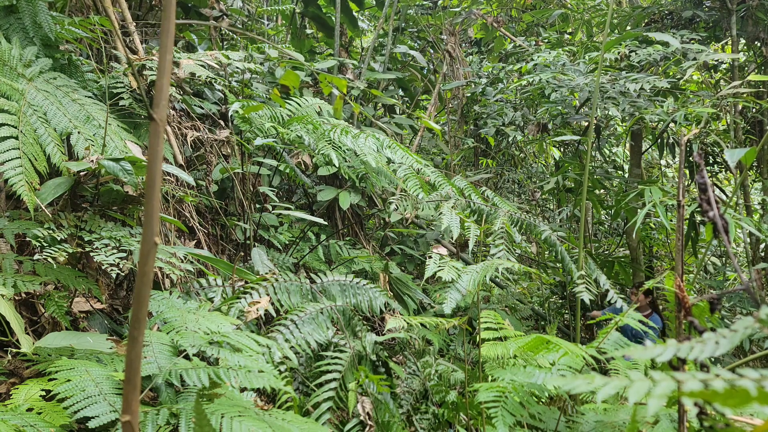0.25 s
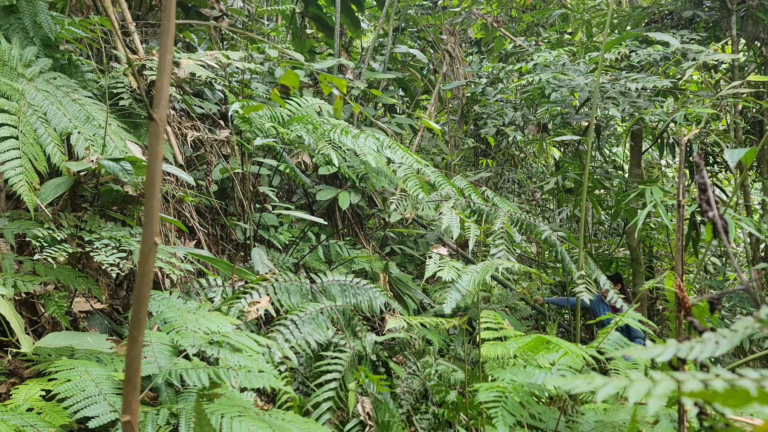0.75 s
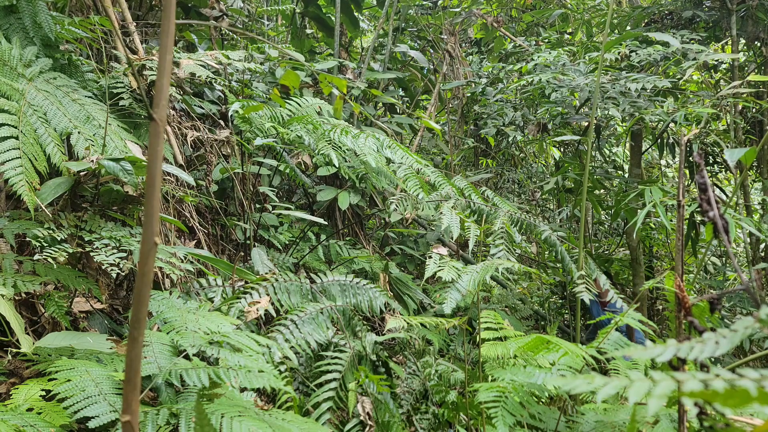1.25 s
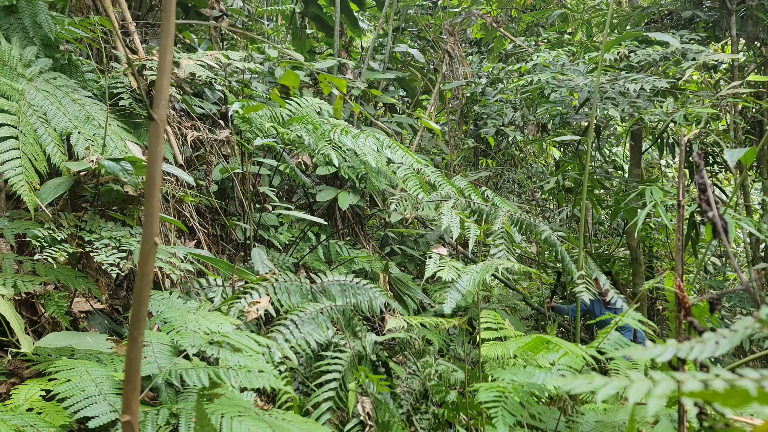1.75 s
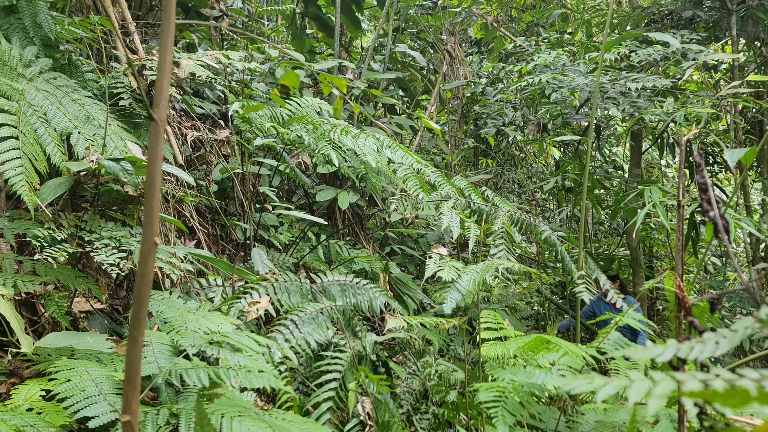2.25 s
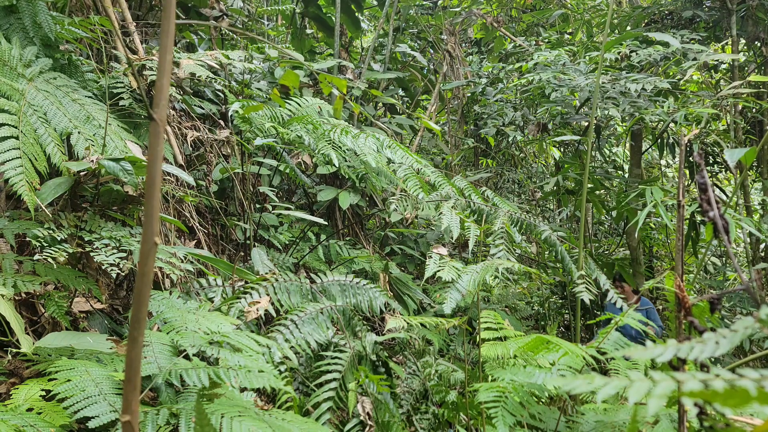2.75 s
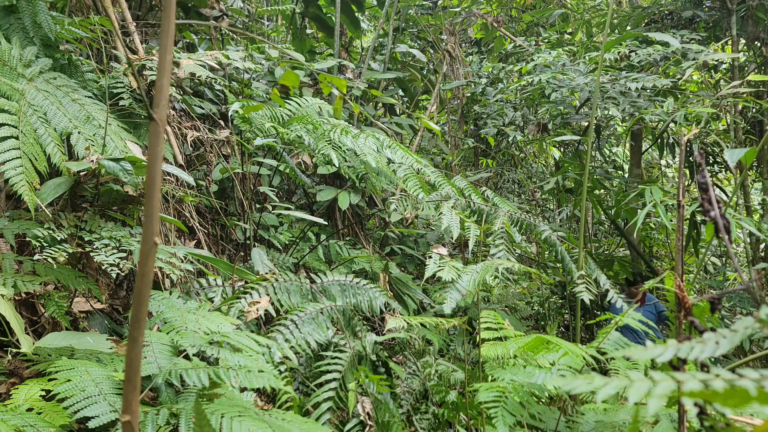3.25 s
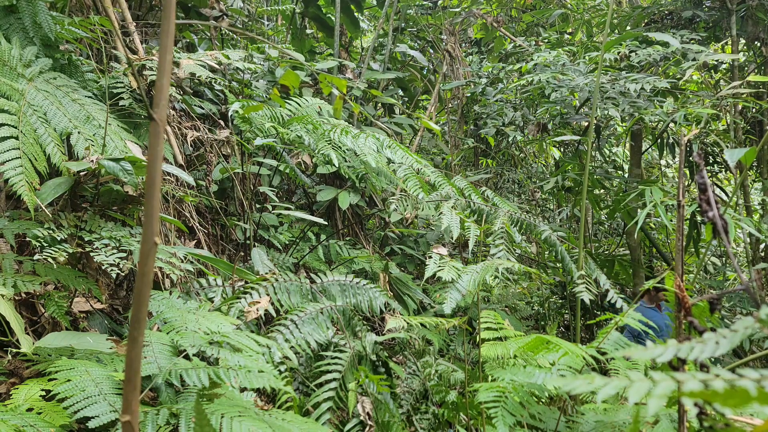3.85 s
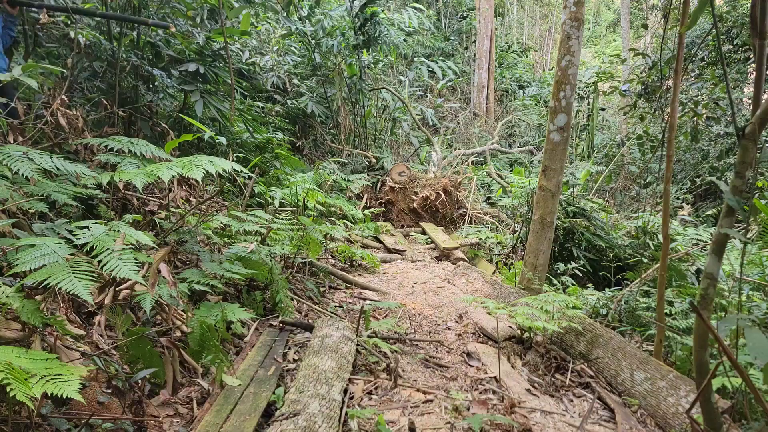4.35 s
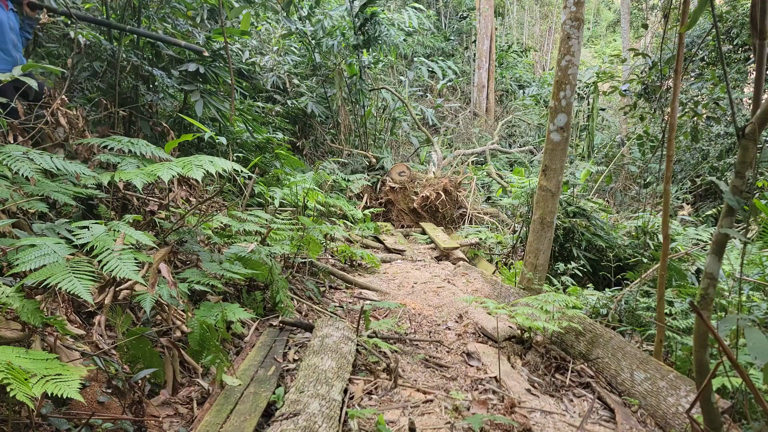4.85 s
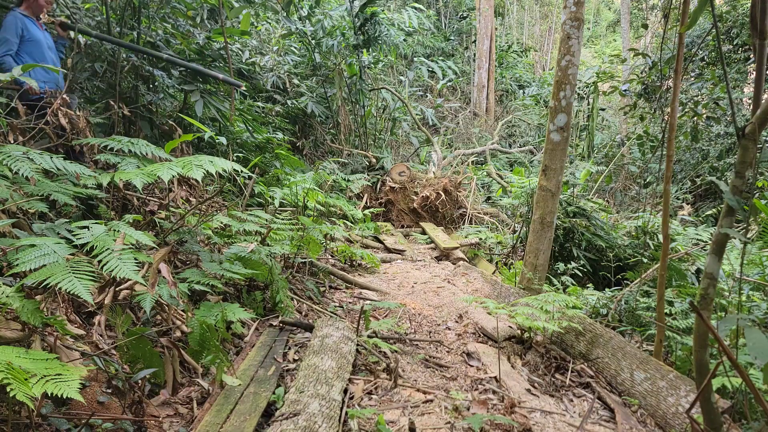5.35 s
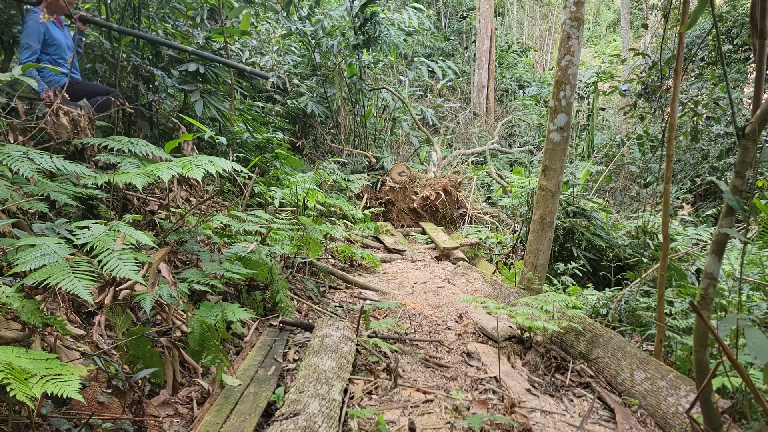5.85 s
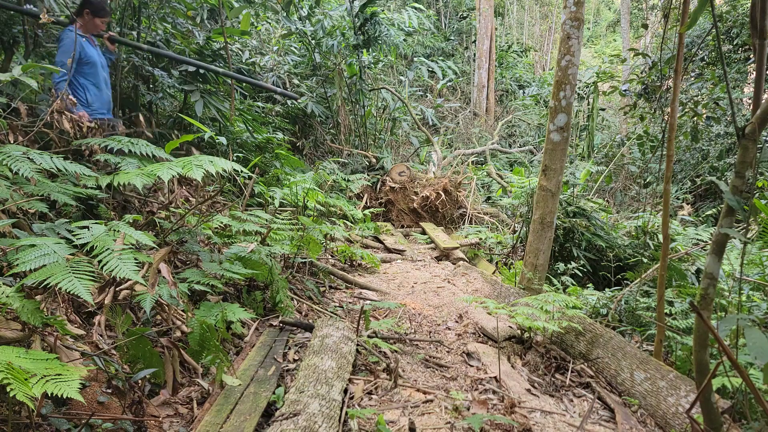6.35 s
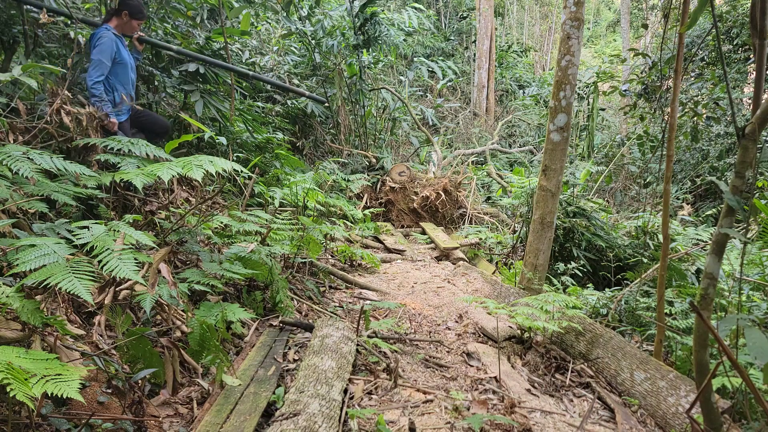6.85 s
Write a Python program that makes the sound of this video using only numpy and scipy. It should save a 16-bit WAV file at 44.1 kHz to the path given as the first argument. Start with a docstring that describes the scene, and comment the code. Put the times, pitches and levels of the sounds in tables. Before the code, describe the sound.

A bamboo pole is chopped twice at a distance, the wood tearing and the tube ringing hollow through the forest. Around the blows come light leaf rustles, woody clacks, small snaps and low thuds over a faint hush. The sound cuts out briefly past the middle, then returns nearer the microphone as a person pushes through ferns, with louder, crisper rustling, breaking twigs and a few soft steps.

```python
"""Splitting bamboo in a forest

Two hard chops split a bamboo pole some way from the microphone: the wood cracks, the air in the tube
rings hollow and the trunks echo. Leaves drag, stems knock, twigs snap and dull thuds carry from the
slope. After a moment of silence someone wades through ferns and dry litter, nearer and to the left."""
import sys
import numpy as np
from scipy import signal
from scipy.fft import rfft, irfft, next_fast_len
from scipy.io import wavfile
from scipy.ndimage import uniform_filter1d

SR = 44100
rng = np.random.default_rng(int(sys.argv[2]) if len(sys.argv) > 2 else 0)


def unload_audio(sound):
    """Save the sound as a 16-bit wav file, at the path given as the first command line argument."""
    columns = np.transpose(np.atleast_2d(sound))
    # keep every value between -1 and 1, then stretch to whole-number steps
    steps = np.round(np.clip(columns, -1, 1) * 32767)
    wavfile.write(sys.argv[1], SR, steps.astype(np.int16))


N = 313110

# the fade to silence between the far place and the near one: (time [s], fader position [0-1])
FADER = [(4.335, 1), (4.38, 0), (4.449, 0), (4.485, 1)]
NEAR_FROM_S = FADER[1][0]
FAR_LAG, NEAR_LAG = 6, -10  # samples by which the left channel is late
FAR_PAN_DB, NEAR_PAN_DB = -2.5, -1  # left minus right


def amp(db):
    """Decibels to gain."""
    return 10 ** (np.asarray(db) / 20)


def unit(x):
    """Scales to rms 1."""
    return x / np.sqrt(np.mean(x ** 2) + 1e-20)


def read(points, hz):
    """Reads a spectrum on a log-frequency axis."""
    f, value = np.transpose(points)
    return np.interp(np.log(hz + 1), np.log(f), value)


def add(mix, s, sound):
    """Mixes a stereo sound in at time s."""
    part = mix[:, round(s * SR):][:, :sound.shape[1]]
    part += sound[:, :part.shape[1]]


def freqs(x):
    """Frequency of each bin of x."""
    return np.fft.rfftfreq(x.shape[-1], 1 / SR)


def colour(x, db):
    """Filters by a gain in dB per bin."""
    return irfft(rfft(x) * amp(db), x.shape[-1])


def pan(db):
    """Gains of left and right."""
    return amp([[db / 2], [-db / 2]])


def place(s):
    """Lag and channel gains of where the person is at time s."""
    return (FAR_LAG, pan(FAR_PAN_DB)) if s < NEAR_FROM_S else (NEAR_LAG, pan(NEAR_PAN_DB))


def stereo_pair(three, lag):
    """One common signal, late on the left by lag samples, plus a scattered one for each channel."""
    # likeness of the microphone's two sides: (frequency [Hz], shared power [0-1])
    likeness = [(100, 0.83), (400, 0.84), (900, 0.6), (2000, 0.41), (5000, 0.14), (15000, 0.21)]
    common = np.clip(read(likeness, freqs(three)), 0, 1)
    direct = np.array([np.roll(three[0], lag), three[0]])
    return irfft(rfft(direct) * np.sqrt(common) + rfft(three[1:]) * np.sqrt(1 - common), three.shape[-1])


def noise(points, lag, size=SR, tilt_db=0, grain_db=0, grain_hz=100):
    """Stereo noise of a given spectrum, tilted per octave, with the random resonances of wood grain."""
    x = stereo_pair(rng.standard_normal((3, size)), lag)
    hz, knots = freqs(x), np.arange(0, SR / 2, grain_hz)
    resonances = grain_db * np.interp(hz, knots, rng.standard_normal(len(knots))) if grain_db else 0
    return unit(colour(x, read(points, hz) + tilt_db * np.log2(hz + 1) + resonances))


def forest_air(level_db=-64):
    """The faint hush of still forest all around the microphone."""
    # still air: (frequency [Hz], level [dB])
    hush = [(25, 17), (45, 0.5), (90, -7.5), (260, -12.5), (470, -2.5), (680, -9), (1250, -5), (1950, -12),
            (3600, -6), (6500, -9.5), (8700, -8), (11000, -15), (15500, -14)]
    return amp(level_db) * noise(hush, 0, size=N)


def stirring(start, swell, hold, t, settle_db_per_s=101, linger_db=-7, linger_db_per_s=46.5):
    """Gain of one push: fronds are pressed, slide and settle; the last leaves and the echo linger."""
    pressed = np.clip((t - start) / swell, 0, 1) ** 0.88
    since = np.maximum(t - start - swell - hold, 0)
    return pressed * np.maximum(amp(-settle_db_per_s * since), amp(linger_db - linger_db_per_s * since))


def push_levels(far):
    """Times, and levels in dB of swish, crisp edge and litter, summed over the far or near pushes."""
    # pushes through the foliage: (start [s], swell [s], hold [s], swish [dB],
    # crisp edge over swish [dB], litter over swish [dB])
    pushes = [(0, 0.0033, 0.029, -64, -1.5, -14), (0.25, 0.045, 0.19, -66.5, -4, -2),
              (0.565, 0.027, 0.018, -66.5, 0, -17), (0.683, 0.23, 0.097, -59, -2.5, 0.5),
              (0.862, 0.082, .01, -48, -8, -5.5), (1.13, 0.06, 0.053, -62, -12, -9),
              (2.006, 0.048, 0.049, -50.5, -4, -2.5), (2.12, 0.018, 0.07, -53, 0, -8.5),
              (2.265, 0.46, .08, -53.5, -3.5, -8), (2.758, 0.094, .33, -52.5, 2, -12),
              (3.106, 0.063, .04, -50, -4, -6.5), (3.334, 0.055, 0.16, -61.5, -1.5, -18),
              (3.609, 0.012, 0.015, -67, 6, -9.5), (4.085, 0.011, 0.022, -70, -0.5, -6),
              (4.146, 0.013, 0.018, -70.5, -4, -6), (4.269, 0.036, 0.054, -74, -15.5, -3),
              (4.525, .03, .2, -89.5, 11, 3.5), (4.758, 0.2, .06, -48, 1, -13),
              (5.006, 0.032, 0.023, -45, -2, -14), (5.094, 0.028, 0.018, -42.5, -0.5, -11.5),
              (5.184, 0.024, 0.043, -45.5, 2.5, -16.5), (5.268, 0.0093, 0.0067, -45, 0, -14),
              (5.444, 0.036, 0.26, -45.5, 0.5, -12), (5.756, 0.023, 0.079, -50, -1, -15.5),
              (6.119, 0.033, 0.027, -53, 2, -14.5), (6.178, 0.18, 0.013, -40.5, 2, -10),
              (6.452, 0.19, 0.16, -46.5, 0, -12.5), (6.908, 0.015, 0.012, -56.5, -1, -15),
              (6.933, 0.23, 0.056, -45.5, -1, -13.5)]
    t = np.linspace(0, N / SR, N // 100)
    power = sum((amp([[db], [db + crisp_db], [db + litter_db]]) * stirring(start, swell, hold, t)) ** 2
                for start, swell, hold, db, crisp_db, litter_db in pushes if (start < NEAR_FROM_S) == far)
    return t, *(10 * np.log10(power + 1e-20))


def patchy(x, depth_db):
    """Every leaf has its own colour: short random patches in time and pitch."""
    spectra = signal.stft(x, nperseg=1024, noverlap=768)[2]
    patches = uniform_filter1d(rng.standard_normal(spectra.shape[1:]), size=5, axis=0)
    patches = unit(uniform_filter1d(patches, size=5, axis=1))
    return signal.istft(spectra * amp(depth_db * patches), nperseg=1024, noverlap=768)[1][:, :x.shape[1]]


def foliage(push, spectrum, lag, flicks_per_s, spread_db, swish_db, patchy_db, gains_db, clump_db=1.0):
    """Leaves flick in clumps of tiny clicks over the swish of fronds sliding past each other."""
    times, *levels = push
    size = next_fast_len(N, True)
    t = np.arange(size) / SR
    strengths = amp(spread_db * np.minimum(rng.exponential(1, (3, size)), 4.5))
    signs = rng.choice([-1, 1], (3, size))
    flicks = unit(strengths * signs * (rng.random((3, size)) < flicks_per_s / SR))
    clumps = unit(uniform_filter1d(uniform_filter1d(rng.standard_normal(size), size=400), size=80))
    swish = amp(swish_db) * rng.standard_normal((3, size))
    leaves = patchy(stereo_pair((flicks + swish) * amp(clump_db * clumps), lag), patchy_db)
    hz = freqs(leaves)
    leaves = colour(leaves, read(spectrum, hz))
    # light contact is crisp, a hard push swishes, and the foot's weight crushes the litter below
    above_ground = 1 / (1 + (1350 / (hz + 1)) ** 8)
    crisp = 1 / (1 + (7500 / (hz + 1)) ** 8)
    shares = above_ground - crisp, crisp, 1 - above_ground
    return sum(unit(irfft(rfft(leaves) * share, size)) * amp(np.interp(t, times, db) + gain)
               for share, db, gain in zip(shares, levels, gains_db))[:, :N]


def slope_leaves():
    """Leaves drag on the slope, far off and a little to the right: more swish than clicks."""
    # distant rustle: (frequency [Hz], level [dB])
    rustle = [(35, -50), (60, -20.5), (118, -11), (335, -19), (385, -5.5), (533, -1.5), (673, -6.5),
              (1380, 4.5), (1740, -1.5), (3190, 8), (5840, 0), (9080, -7), (11700, -10.5), (14500, -9.5),
              (15500, -18)]
    return pan(FAR_PAN_DB) * foliage(push_levels(far=True), rustle, FAR_LAG, flicks_per_s=6000,
                                     spread_db=1.5, swish_db=2.5, patchy_db=2.1, gains_db=(1, 1, 1))


def near_ferns():
    """Someone wades through ferns close to the microphone, where single flicks stand out more."""
    # close rustle: (frequency [Hz], level [dB])
    rustle = [(40, -33), (90, -10.5), (170, -7), (260, -6.5), (370, 0), (520, -9), (850, -3.5), (1200, 2.5),
              (2200, -2), (3200, 5), (4400, 4.5), (5500, 2), (7000, -3), (9000, -4), (11000, -8.5),
              (15500, -10.5)]
    return pan(NEAR_PAN_DB) * foliage(push_levels(far=False), rustle, NEAR_LAG, flicks_per_s=4000,
                                      spread_db=2.0, swish_db=-1.5, patchy_db=2.5, gains_db=(.5, .5, 0))


def footfalls(mix, t60=0.25):
    """The soft low push of boots into litter."""
    # boots landing: (time [s], level [dB])
    steps = [(3.168, -62), (5.061, -72), (5.702, -59.5), (6.335, -54.5), (6.649, -64)]
    # soft ground under a boot: (frequency [Hz], level [dB])
    ground = [(30, -14), (55, -4), (85, -7), (130, -13), (180, 10), (300, -20), (700, -20), (3000, -50)]
    t = np.arange(SR) / SR
    for s, db in steps:
        lag, side = place(s)
        add(mix, s, side * noise(ground, lag) * amp(db - 60 * t / t60) * (1 - np.exp(-t / 0.0055)))


def bass_late(x, late_s=.017, below_hz=450):
    """Sound that has come far over soft ground brings its bass a little late."""
    return irfft(rfft(x) * np.exp(-2j * np.pi * late_s * below_hz * np.log1p(freqs(x) / below_hz)),
                 x.shape[-1])


def distant_thuds(mix, t60=0.15, ring_hz=435, ring_t60=0.81):
    """Soft low blows from the slope, each with a hollow note that lingers among the trees."""
    # dull blows: (time [s], level [dB], ring over blow [dB])
    thuds = [(0.219, -55, -7), (1.360, -50.5, -7.5), (2.290, -53, -6.5), (2.874, -56, -20),
             (3.154, -48.5, -15), (3.208, -48, -14), (4.072, -53, -11)]
    # body of a blow: (frequency [Hz], level [dB])
    body = [(40, -25), (130, -14), (200, -4.5), (290, -18.5), (420, 2.5), (600, -15), (850, -3.5),
            (1300, -19), (3000, -19.5), (9000, -24)]
    note = [(ring_hz / 2, -40), (ring_hz * 0.86, -15), (ring_hz, 0),
            (ring_hz * 1.2, -15), (ring_hz * 4, -40)]
    t = np.arange(SR) / SR
    for s, db, ring_db in thuds:
        blow = noise(body, FAR_LAG) * amp(-60 * t / t60)
        ring = noise(note, FAR_LAG) * amp(ring_db - 60 * t / ring_t60)
        add(mix, s, amp(db) * bass_late((blow + ring) * (1 - np.exp(-t / 0.002))))


def stem_knocks(mix, gain_db=-5, echo_t60=0.22):
    """Stems strike each other: woody clacks, each around one broad resonance."""
    # clacks: (time [s], level before gain [dB], pitch [Hz], t60 [s], echo over clack [dB])
    knocks = [(0.331, -42, 1140, 0.12, -18), (0.357, -47, 1110, .045, -26), (0.69, -47.5, 2100, 0.12, -18),
              (1.517, -56.5, 800, 0.22, -12), (2.148, -39.5, 1010, 0.078, -26), (2.179, -43, 565, .05, -30),
              (2.617, -50, 860, 0.055, -22), (2.812, -48.5, 1280, 0.073, -8),
              (2.879, -48, 1190, 0.064, -21), (3.037, -41.5, 560, 0.05, -22),
              (3.522, -42.5, 1330, 0.07, -21), (3.826, -53, 940, 0.097, -15.5),
              (3.856, -52, 860, 0.08, -24), (3.93, -54, 1310, 0.097, -22), (4.322, -58.5, 1144, .09, -16.5),
              (4.545, -58, 785, 0.038, -13), (5.271, -40, 380, 0.031, -10), (7.042, -48, 1310, 0.24, -5)]
    t = np.arange(SR // 2) / SR
    for s, db, hz, t60, echo_db in knocks:
        lag, side = place(s)
        wood = [(hz / 6, -28), (hz * 0.86, -9), (hz, 0), (hz * 1.16, -11), (hz * 3, -27), (hz * 10, -50)]
        decay = amp(-60 * t / t60) + amp(echo_db - 60 * t / echo_t60)
        add(mix, s, side * noise(wood, lag, len(t)) * amp(db + gain_db) * decay)


def twig_snaps(mix, gain_db=-11, tick_t60=0.015, scatter_db=-4, echo_db=-23, echo_t60=1.0):
    """Sharp ticks, scattered by nearby leaves and then the forest; distance dulls and softens them."""
    # breaking twigs: (time [s], level before gain [dB], centre [Hz], first tick [dB], treble [dB])
    snaps = [(0.3313, -33, 3230, 13.5, -10), (0.7487, -42.5, 4000, 16.5, -18),
             (1.1994, -48.5, 7760, 18.5, -21), (1.3135, -44.5, 2920, 2, 0), (1.824, -51, 9000, 11, -3),
             (2.8144, -40, 7960, 12, -18), (3.1689, -37, 2960, 2, -18), (3.522, -39, 2860, 4, 1),
             (3.8277, -37.5, 3300, -5, -12), (3.8393, -41.5, 3320, 1, 0), (3.8584, -40, 5240, 5, -12),
             (4.5453, -48.5, 4460, 5, -12), (4.7575, -56, 6000, 10, 1), (5.0265, -34, 4300, 4, -6),
             (4.928, -34.5, 4500, 11, -9), (5.119, -22, 3400, -2.5, -6.5), (5.214, -28, 4270, 8, -9),
             (5.271, -16, 5700, 8.5, -6.5), (5.5481, -24, 3580, -1, -2), (5.631, -24.5, 4130, 5, -4),
             (5.6665, -40.5, 4830, 17, -24), (5.704, -24.5, 3800, 9, -9), (6.135, -34.5, 4630, 3, -12),
             (6.6318, -30, 5030, 1, -26), (6.652, -32.5, 3970, 10, -13), (7.0015, -37, 4130, 10.5, -14)]
    t = np.arange(SR // 2) / SR
    for s, db, hz, tick_db, treble_db in snaps:
        lag, side = place(s)
        dull_db, soft_db, scatter_t60 = (-8, -6, 0.26) if s < NEAR_FROM_S else (0, 0, 0.23)
        top_db = treble_db + dull_db
        wood = [(hz / 20, -32), (hz / 4, -15), (hz / 2, -9), (hz, 0),
                (hz * 2, top_db * 0.58), (hz * 3, top_db)]
        twig = noise(wood, lag, len(t), grain_db=3, grain_hz=300)
        tick = amp(tick_db + soft_db - 60 * t / tick_t60)
        scatter = amp(scatter_db - 60 * t / scatter_t60) + amp(echo_db - 60 * t / echo_t60)
        add(mix, s, side * twig * amp(db + gain_db) * (tick + scatter) * (1 - np.exp(-t / 0.0001)))


def tube_ring(cut, level_db, delay, t, column_hz=127.2, first_touch_db=-9):
    """The pole's wall rings along with its air column, which is closed at one end."""
    # air column at odd multiples 1, 3, 5, 7: (first cut [dB], second cut [dB], t60 [s])
    column = [(-1.5, -1.5, 0.68), (-0.5, -6.5, 0.35), (3.5, 4.5, 0.12), (9, 9.5, 0.061)]
    # wall modes: (frequency [Hz], first cut [dB], second cut [dB], t60 [s])
    wall = [(102, 3.5, -6, 0.061), (920, -1.5, -5.5, 0.068), (1047, -2, -8.5, 0.18), (1180, -2, -10, 0.22),
            (1448, -9.5, 5.5, 0.065), (1680, -5, -7.5, 0.28), (1835, -6.5, -14.5, .13),
            (1875, -3.5, -16, 0.17), (2227, -1.5, -4.5, .18), (2720, -12.5, 1, 0.25),
            (3100, -1.5, -14.5, 0.22)]
    modes = [((2 * k + 1) * column_hz, *row) for k, row in enumerate(column)] + list(wall)
    since_split = np.maximum(t - delay, 0)
    touch, tube = amp(first_touch_db), np.zeros(len(t))
    for (hz, *db, t60), phase in zip(modes, rng.uniform(0, 2 * np.pi, len(modes))):
        # a mode builds up within a cycle: a little when the edge enters, fully when the pole gives way
        build_up = 1 - touch * np.exp(-2 * t * hz) - (1 - touch) * np.exp(-2 * since_split * hz)
        decay = amp(level_db + db[cut] - 60 * since_split / t60)
        tube += decay * build_up * np.sin(2 * np.pi * hz * t + phase)
    return np.array([np.roll(tube, FAR_LAG), tube]) * pan(db=-1.8)


def bamboo_chops(mix, bite_db=-26, bite_t60=0.021, ragged_db=4.0, ragged_s=.036,
                 crack_t60=0.2, echo_t60=1.0):
    """The blade bites, fibres tear in a ragged burst, the tube rings and trunks throw the crack back."""
    # blows of the blade: (time [s], crack [dB], tearing time [s], tube [dB], tube delay [s],
    # brightness [dB/octave], echo [dB])
    chops = [(.8432, -24, 0.02, -30.5, .011, 0.96, -42.5),
             (1.9956, -24.5, 0.0098, -30.5, 0.0012, -0.8, -40.5)]
    # splitting wood: (frequency [Hz], level [dB])
    fibres = [(35, -40), (70, -27), (240, -22), (450, -7.5), (700, -4.5), (1300, -4), (2000, -1.5),
              (3300, -2.5), (5000, -6), (7000, -11), (9000, -8.5), (12000, -16), (16000, -17)]
    # echo off the trunks: (frequency [Hz], level [dB])
    trunks = [(40, -40.5), (100, -24.5), (260, -12.5), (500, -3.5), (1200, -11.5), (2000, -0.5),
              (3600, 0.5), (6000, -8), (9000, -7), (12000, -10), (16000, -16)]
    # a thin pole radiates almost nothing below its lowest mode
    radiation = signal.butter(4, 78, "highpass", fs=SR, output="sos")
    t = np.arange(SR) / SR
    for cut, (s, crack_db, tear_s, tube_db, delay, tilt_db, echo_db) in enumerate(chops):
        jitter = unit(uniform_filter1d(rng.standard_normal(SR), size=50))
        ragged = amp(ragged_db * jitter * np.exp(-t / ragged_s))
        bite = amp(bite_db - 60 * t / bite_t60)
        tearing = amp(crack_db - 60 * np.maximum(t - tear_s, 0) / crack_t60)
        wood = noise(fibres, FAR_LAG, tilt_db=tilt_db, grain_db=2.2, grain_hz=70)
        crack = wood * ragged * np.hypot(bite, tearing)
        echo = noise(trunks, FAR_LAG) * amp(echo_db - 60 * t / echo_t60) * (1 - np.exp(-t / 0.018))
        sound = (crack + echo) * pan(FAR_PAN_DB) + tube_ring(cut, tube_db, delay, t)
        add(mix, s, signal.sosfilt(radiation, sound))


def scene():
    """Still air, moving foliage and every impact, as they reach the microphone."""
    mix = forest_air() + slope_leaves() + near_ferns()
    for source in bamboo_chops, distant_thuds, stem_knocks, twig_snaps, footfalls:
        source(mix)
    return mix


def record(dry, low_cut_hz=62, high_cut_hz=15900, ceiling=.6):
    """The microphone sheds deep bass and top treble and rounds peaks; a fade parts the two places."""
    heard = signal.sosfilt(signal.butter(3, low_cut_hz, "highpass", fs=SR, output="sos"), dry)
    rounded = ceiling * np.tanh(heard / ceiling)
    fade = np.interp(np.arange(N) / SR, *np.transpose(FADER)) ** 2
    high_cut = signal.firwin(511, high_cut_hz, window=("kaiser", 9), fs=SR)
    return signal.oaconvolve(rounded * fade, high_cut[None], "same")


dry = scene()
out = record(dry)
unload_audio(out)
```